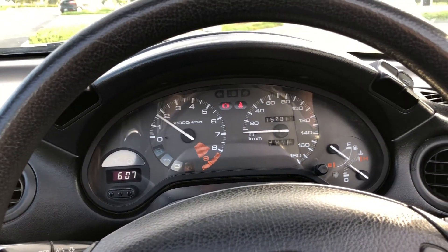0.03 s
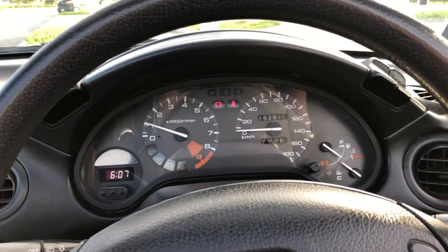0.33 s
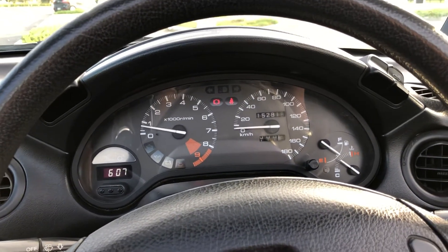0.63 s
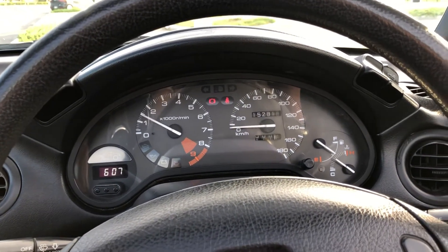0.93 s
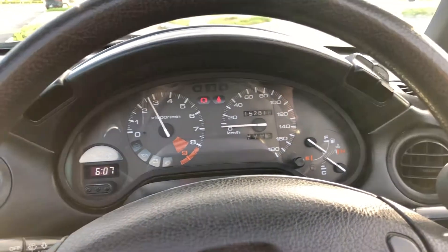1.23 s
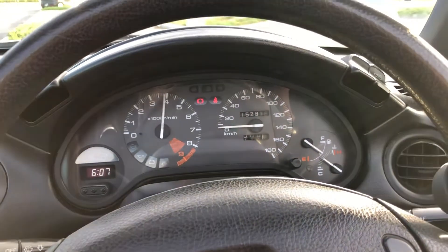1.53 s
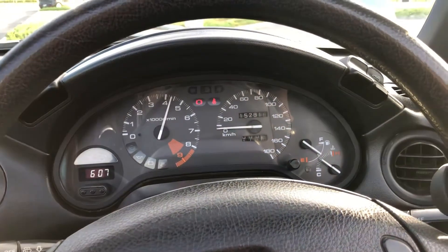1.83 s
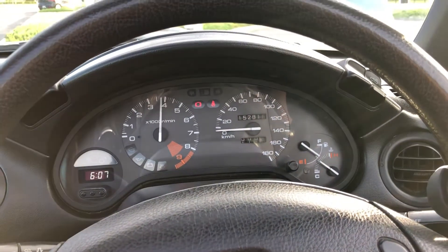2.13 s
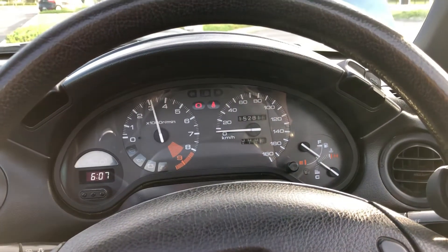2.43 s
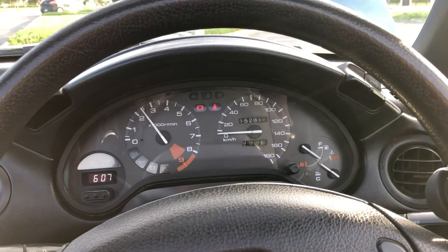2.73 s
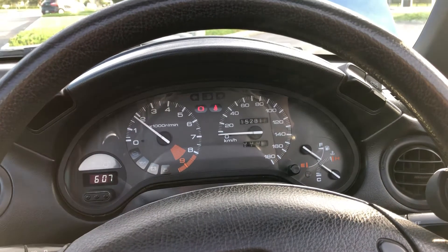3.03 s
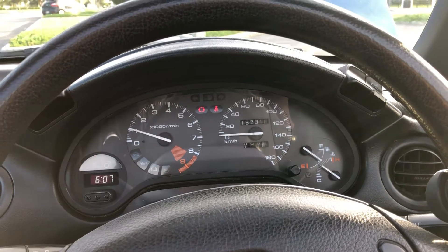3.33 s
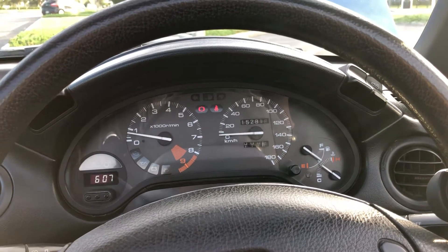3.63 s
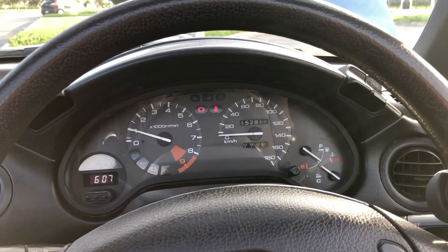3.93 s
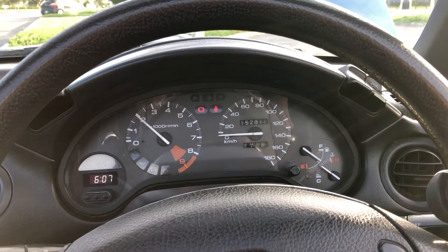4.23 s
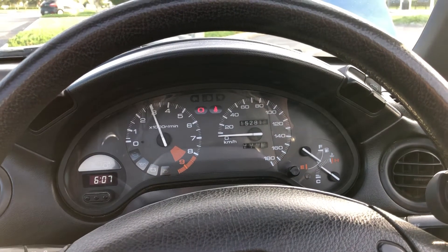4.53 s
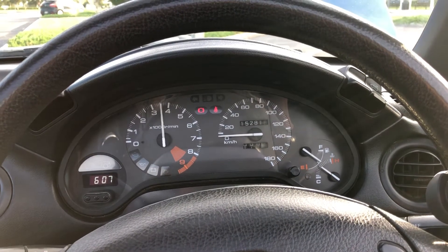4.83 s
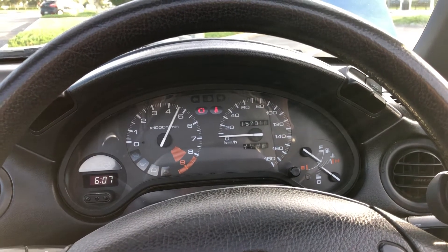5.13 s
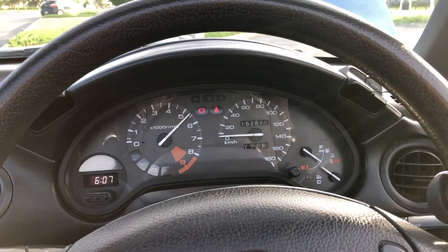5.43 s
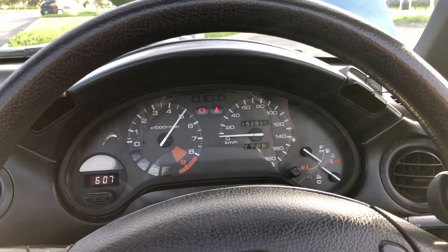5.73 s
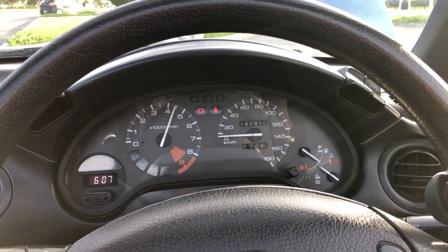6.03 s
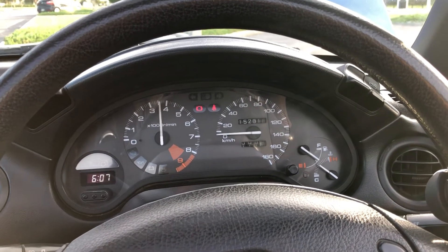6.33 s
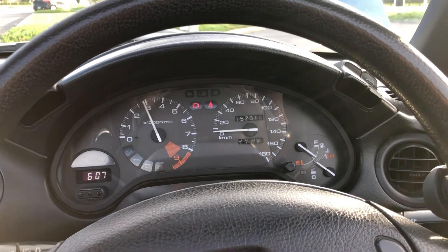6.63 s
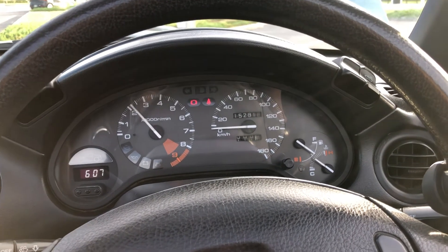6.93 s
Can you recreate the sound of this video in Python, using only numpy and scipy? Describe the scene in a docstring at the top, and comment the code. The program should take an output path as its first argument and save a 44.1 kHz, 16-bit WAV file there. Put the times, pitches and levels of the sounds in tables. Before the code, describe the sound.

A parked four-cylinder car is heard from the driver's seat over a steady rush of air. The engine settles to idle, revs up quickly with a booming hum and a faint whine, then coasts down. A second, longer rev climbs higher with a brighter roar and a few dull knocks on the way up. The exhaust gives one soft burble as the engine winds down again.

```python
"""A parked four-cylinder car, microphone inside at the driver's seat, a steady rush of air behind it all.
The engine settles to idle, is revved quickly at 0.6 s and coasts down. As the speed moves, the firing
note sweeps through the cabin's boom resonances, with weaker shaft orders and a belt-driven whine above,
while the intake and mechanical roar swells and brightens. A longer, deeper push follows at 3.7 s, with
three dull knocks in the cabin on the way up; the exhaust burbles once as the revs fall again."""
import sys
import numpy as np
from scipy import signal
from scipy.fft import rfft, irfft, next_fast_len
from scipy.io import wavfile
from scipy.ndimage import uniform_filter1d, map_coordinates

SR = 44100
rng = np.random.default_rng(int(sys.argv[2]) if len(sys.argv) > 2 else 0)


def wav_out(sig):
    """Save sig, one row per channel (or a flat mono array), as 16-bit PCM at SR to the path in sys.argv[1]."""
    wavfile.write(sys.argv[1], SR, np.round(np.clip(np.atleast_2d(sig).T, -1, 1) * 32767).astype(np.int16))


N = 308700
MID_SPEED = 70  # middle of the rev range, turns per second


def amp(db):
    """Decibels to gain."""
    return 10 ** (np.asarray(db) / 20)


def unit(x):
    """Scale to rms 1."""
    return x / np.sqrt(np.mean(x ** 2) + 1e-20)


def along(points, hz):
    """Read (Hz, value) points on a log frequency axis."""
    freqs, values = np.transpose(points)
    return np.interp(np.log(hz + 1), np.log(freqs + 1), values)


def wobble(rate):
    """A smooth random curve, rate knots a second."""
    knots = rng.standard_normal(2048)
    grid = np.arange(0, N, 64)
    coarse = map_coordinates(knots, [grid * rate / SR], mode="mirror")
    return np.interp(np.arange(N), grid, coarse)


def filtered(x, response):
    """Shape x by a gain given as a function of Hz."""
    size = next_fast_len(N + SR // 2)
    return irfft(rfft(x, size) * response(np.fft.rfftfreq(size, 1 / SR)), size)[:N]


def tone(angle, flutter, drift):
    """A sine of rms near 1, wavering in size (flutter, a share) and phase (drift, radians)."""
    phase = angle + rng.uniform(0, 2 * np.pi) + drift * wobble(14)
    return np.sqrt(2) * np.sin(phase) * (1 + flutter * wobble(35))


def coast(start_s, start_speed, end_s):
    """(s, speed) rows, pedal up: friction and drag slow the crank until the idle valve catches it."""
    friction, drag = 34.0, .055  # lost each second: turns per second, share of the speed
    catch_speed, idle_speed = 16, 12  # turns per second
    t = np.arange(0, end_s - start_s, .01)[1:]
    free = (start_speed + friction / drag) * np.exp(-drag * t) - friction / drag
    caught = np.maximum(catch_speed + .7 * (free - catch_speed), idle_speed)
    return np.column_stack([start_s + t, np.maximum(free, caught)])


def crank_speed():
    """Turns per second: the engine coasts around two pedal pushes; the flywheel rounds the corners."""
    # A quick push and its release. Each row: time in seconds, speed in turns per second.
    quick_push = [(0.57, 12.3), (0.716, 18.2), (0.858, 28.3), (0.928, 33.9), (1.104, 48.4), (1.18, 53.8),
                  (1.296, 61.4), (1.618, 75.8), (1.75, 71.3)]
    # A push that hesitates, goes deeper and lets go. Each row: time in seconds, turns per second.
    long_push = [(3.65, 12.0), (3.738, 15.0), (3.806, 17.1), (3.962, 27.3), (4.07, 34.4), (4.206, 42.8),
                 (4.462, 54.7), (4.816, 66.9), (5.014, 80.1), (5.202, 90.9), (5.332, 94.9), (5.52, 86.2)]
    rows = [(0, 24.8)]  # already coasting down
    for push in (quick_push, long_push):
        rows += [*coast(*rows[-1], end_s=push[0][0]), *push]
    rows += [*coast(*rows[-1], end_s=N / SR)]
    speed = np.interp(np.arange(N) / SR, *np.transpose(rows))
    return uniform_filter1d(speed, size=1500, mode="nearest")


def lugging(revs, throttle):
    """0 to 1: an open throttle at low revs makes each firing heavy."""
    return throttle * np.clip(-revs, 0, 1)


def firing(speed, angle, throttle):
    """Two firings a turn: the deep note that booms in the cabin, a little more on the overrun."""
    # The boom at the driver's seat. Each row: firing rate in Hz, level in dB.
    boom = [(28, -52), (38, -30), (46, -23), (54, -14), (61, -9.3), (66, -8.8), (75, -16.5), (92, -21.5),
            (103, -19.5), (114, -22.5), (127, -18.5), (139, -13.5), (151, -17), (159, -23), (163, -30),
            (168, -21.5), (174, -24), (189, -16)]
    overrun_db = (.9 - 2 * throttle) * np.clip(speed / 30 - 1, 0, 1)
    return amp(along(boom, 2 * speed) + overrun_db) * tone(2 * angle, flutter=.04, drift=.03)


def whine(speed, angle, revs, throttle):
    """Strong shaft orders and belt-driven parts each meet the body's resonances in their own way."""
    # Each one's path to the seat. Each row: frequency in Hz, level in dB.
    third = [(35, -50), (62, -37), (90, -46), (200, -50), (228, -38), (252, -37), (270, -30), (282, -19)]
    fourth = [(46, -44), (61, -19.5), (67, -20), (82, -33), (125, -38), (185, -40), (208, -32.5),
              (238, -31.5), (255, -47), (282, -28), (308, -40), (330, -31), (350, -40), (378, -30)]
    sixth = [(70, -42), (190, -54), (235, -44), (275, -52), (328, -37), (368, -47), (400, -36.5),
             (432, -33), (475, -48), (570, -45)]
    eighth = [(100, -55), (230, -54), (285, -39), (340, -53), (410, -49), (445, -39), (515, -52),
              (545, -41), (575, -36.5), (640, -51), (750, -43)]
    pulley = [(55, -46), (76, -36), (120, -50), (255, -49), (293, -29.5), (315, -42), (333, -34),
              (365, -40), (440, -47)]
    fan = [(200, -66), (700, -60), (830, -46.5), (915, -39.5), (970, -44.5), (1030, -41), (1110, -48),
           (1200, -43), (1300, -39)]

    def sing(order, path, flutter, drift, lug_db=0, load_db=0):
        level_db = along(path, order * speed) + lug_db * lugging(revs, throttle) + load_db * throttle
        return amp(level_db) * tone(order * angle, flutter, drift)

    return (sing(3, third, flutter=.12, drift=.08, lug_db=2)
            + sing(4, fourth, flutter=.12, drift=.1, lug_db=6)
            + sing(6, sixth, flutter=.2, drift=.15, lug_db=5)
            + sing(8, eighth, flutter=.2, drift=.15, load_db=-3)
            + sing(4.68, pulley, flutter=.2, drift=.25, lug_db=7)
            + sing(13.93, fan, flutter=.35, drift=.4, lug_db=-5, load_db=-6))


def growl(speed, angle, revs, throttle):
    """Unequal cylinders add weak, rough orders between the clear ones."""
    # Weak orders. Each row: multiple of crank speed, relative level in dB, extra dB under throttle.
    orders = [(1, -2.5, -8), (2.5, -13, -9), (3.5, -6.5, 9.5), (4.5, -6.5, 5.5), (5, -3.5, 5),
              (5.5, -11.5, 8), (6.5, -3, 3.5), (7, -4, 4.5), (8.5, -9.5, 10.5), (9, -5, 3.5), (10, -5, 8.5),
              (11, -7, -3), (14.1, -5.5, -3), (14.8, -5.5, 4.5), (19.7, -4, -2)]
    # Their path through the body. Each row: frequency in Hz, gain in dB.
    body = [(30, -81), (62, -23), (90, -30), (185, -36), (235, -51.5), (255, -44.5), (290, -29), (350, -44),
            (425, -39), (500, -49.5), (600, -40), (760, -48), (1050, -41.5), (2200, -39.5)]
    out = np.zeros(N)
    for order, db, load_db in orders:
        level_db = db + load_db * throttle + along(body, order * speed)
        out += amp(level_db) * tone(order * angle, flutter=.58, drift=.49)
    return amp(-4.5 + 5.3 * revs) * out


def dashboard_noise(spectrum, ripple_db):
    """Noise of rms 1 heard through the dashboard; reflections off the glass ripple its spectrum."""
    # Bulkhead and dashboard resonances. Each row: centre in Hz, width in Hz, lift in dB.
    resonances = [(755, 20, 1.5), (1030, 25, 3.5), (1233, 84, 2), (1506, 110, 2.5), (1810, 42, 1),
                  (2200, 76, -1.5), (2266, 30, 3), (2434, 30, 5), (2914, 70, -5.5), (3200, 120, 3),
                  (3703, 55, 4.5), (3778, 150, -2.5), (4280, 78, 3), (4624, 65, 5), (6700, 100, 2),
                  (12440, 500, 2)]
    knots = rng.standard_normal(2048)

    def response(hz):
        lift_db = sum(db / (1 + (2 * (hz - centre) / width) ** 2) for centre, width, db in resonances)
        ripple = np.interp(hz, np.linspace(0, SR / 2, len(knots)), knots)
        return amp(along(spectrum, hz) + lift_db + ripple_db * ripple)

    return unit(filtered(rng.standard_normal(N), response))


def roar(speed, angle, revs, throttle):
    """Intake and valve noise pulse with the firings and grow with speed; an open throttle deepens them."""
    # The colour of the engine bay. Each row: frequency in Hz, relative density in dB.
    spectrum = [(150, -18), (350, -4.5), (550, -2), (800, -7), (1300, -8), (1900, -11), (2700, -11),
                (3800, -17.5), (5000, -18.5), (7000, -22), (10000, -27.5), (15800, -31)]
    noise = dashboard_noise(spectrum, ripple_db=1.7)
    fizz = filtered(noise, lambda hz: hz ** 4 / (hz ** 4 + 8000 ** 4))
    intake = filtered(noise, lambda hz: 1100 ** 2 / (hz ** 2 + 1100 ** 2))
    # The finest hiss levels off at high revs; both bands flicker.
    fizz_db = .5 - .84 * revs - .39 * revs ** 2 + throttle + .55 * wobble(28)
    intake_db = -.8 + 1.8 * throttle + .5 * revs + .5 * wobble(12)
    shaped = noise + (amp(fizz_db) - 1) * fizz + (amp(intake_db) - 1) * intake
    pulsing = 1 + .036 * np.sin(2 * angle) + .038 * np.sin(angle / 2)
    level_db = -35 + .2514 * (speed - MID_SPEED) + 1.5 * lugging(revs, throttle)
    return amp(level_db) * shaped * pulsing


def rumble(revs, throttle):
    """Irregular engine shake rings the cabin's low resonances; the lowest bass leaks away."""
    # Cabin air and panel resonances. Each row: centre in Hz, width in Hz, relative level in dB.
    modes = [(69, 21, 0), (88, 21.5, -18), (141, 43, -8.5), (229.4, 32, -8), (279.6, 12, -7),
             (318, 31, -15.5), (426, 130, -22.5)]
    # The range in which the cabin rumbles. Each row: frequency in Hz, gain in dB.
    passband = [(15, -28), (32, -28), (50, -1.5), (500, -1.5), (1200, -15), (4000, -43)]

    def cabin(hz):
        power = sum(amp(db) ** 2 / (1 + ((hz ** 2 - centre ** 2) / (hz * width + 1e-9)) ** 2)
                    for centre, width, db in modes)
        return np.sqrt(power) * amp(along(passband, hz))

    shake = unit(filtered(rng.standard_normal(N), cabin))
    return amp(-30 + revs + 1.5 * throttle) * shake


def knocks():
    """Short, heavily damped knocks of trim and body."""
    # Each row: start in seconds, peak level in dB, pitch in Hz, seconds to fade by 60 dB.
    hits = [(4.0595, -13.5, 450, .012), (4.084, -23, 500, .012), (4.527, -13, 340, .017)]
    out, t = np.zeros(N + SR), np.arange(SR // 8) / SR
    for start_s, db, hz, t60 in hits:
        attack = 1 - np.exp(-2 * t * hz)
        ring = amp(-60 * t / t60) * attack * np.sin(2 * np.pi * hz * t)
        out[round(start_s * SR):][:len(t)] += amp(db) * ring / np.max(np.abs(ring))
    return out[:N]


def burble():
    """One soft, uneven swell of the exhaust on the overrun."""
    peak_s, half_length_s, level_db, hz = 5.652, .027, -19.5, 68
    t = np.arange(N) / SR
    swell = np.exp(-((t - peak_s) / half_length_s) ** 2)
    return amp(level_db) * swell * tone(2 * np.pi * hz * t, flutter=.13, drift=.1)


def idle_rush():
    """The steady rush of air that stays when the revs fall."""
    # The colour of the air at idle. Each row: frequency in Hz, relative density in dB.
    spectrum = [(150, -14), (300, -1.5), (420, -1.5), (600, -3.5), (850, -3), (1150, 0), (1500, -3),
                (1850, -9.5), (2600, -11.5), (4000, -16.5), (6500, -20.5), (10000, -27.5), (15800, -47)]
    return amp(-40.5 + .14 * wobble(7)) * dashboard_noise(spectrum, ripple_db=1.5)


def scene():
    """The mix at the driver's seat: crank speed drives the engine; the throttle is open while it climbs."""
    # The cabin air follows late, most at its deep boom. Each row: firing rate in Hz, lag in seconds.
    cabin_lag = [(35, .027), (62, .038), (135, .008)]
    speed = crank_speed()
    angle = 2 * np.pi * np.cumsum(speed) / SR
    lagged_speed = np.interp(np.arange(N) - along(cabin_lag, 2 * speed) * SR, np.arange(N), speed)
    revs = np.log2(speed / MID_SPEED)  # octaves above mid speed
    climb = uniform_filter1d(np.gradient(speed) * SR, size=5000)
    throttle = np.clip(climb / 40, 0, 1)
    tones = firing(lagged_speed, angle, throttle)
    tones += whine(lagged_speed, angle, revs, throttle)
    tones += growl(lagged_speed, angle, revs, throttle)
    noises = rumble(revs, throttle) + roar(speed, angle, revs, throttle) + idle_rush()
    return (tones + noises + knocks() + burble())[None]


def record(dry):
    """One microphone channel, eased at both ends and cut steeply above the top of its band."""
    top_hz, fade_s = 15800, .003
    from_edge = np.minimum(np.arange(N), np.arange(N)[::-1])
    ease = np.clip(from_edge / (fade_s * SR), 0, 1)
    lowpass = signal.ellip(12, .1, 90, top_hz, fs=SR, output="sos")
    return signal.sosfilt(lowpass, dry * ease)


dry = scene()
out = record(dry)
wav_out(out)
```